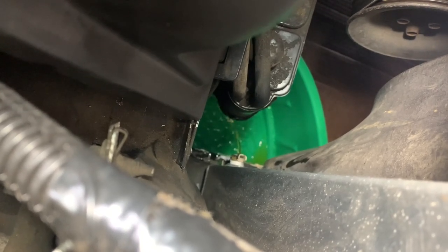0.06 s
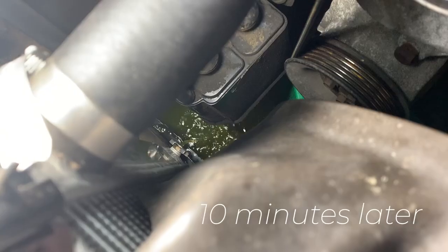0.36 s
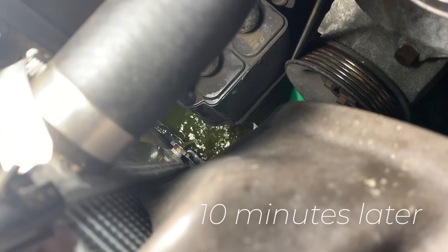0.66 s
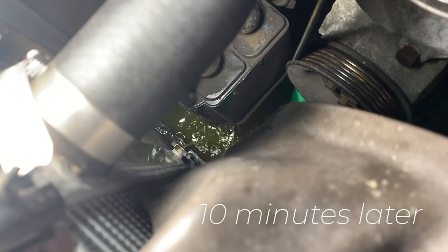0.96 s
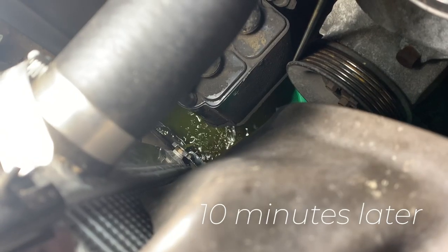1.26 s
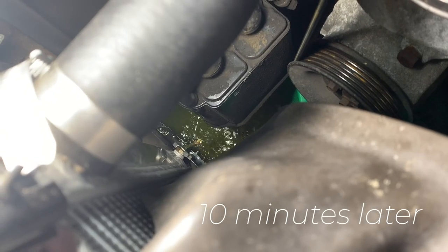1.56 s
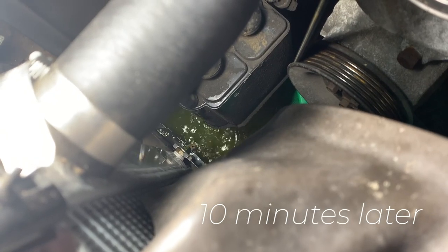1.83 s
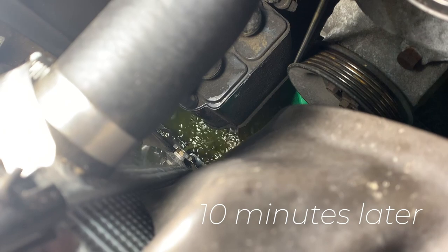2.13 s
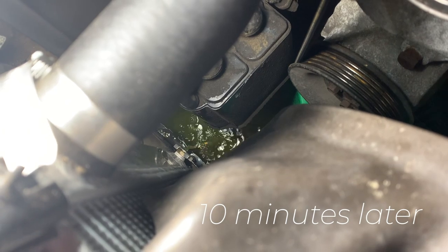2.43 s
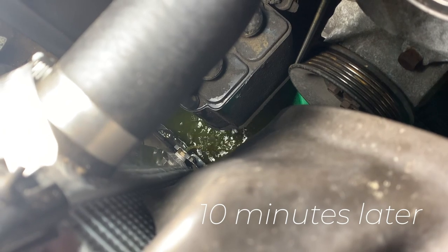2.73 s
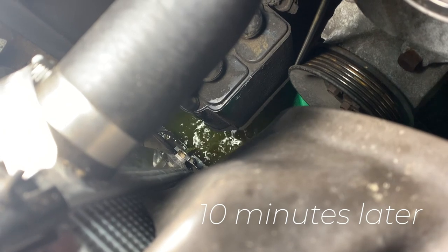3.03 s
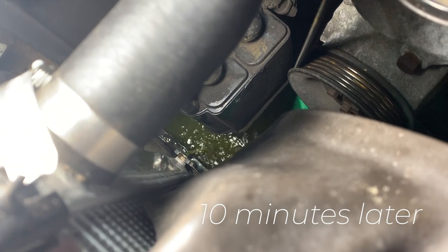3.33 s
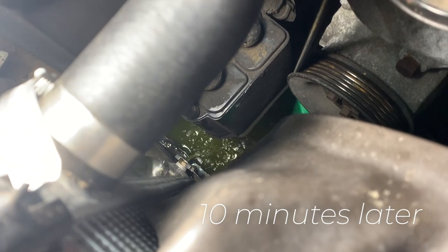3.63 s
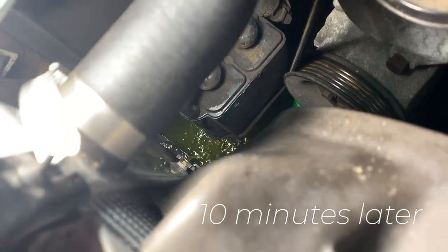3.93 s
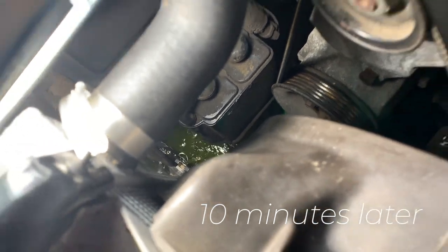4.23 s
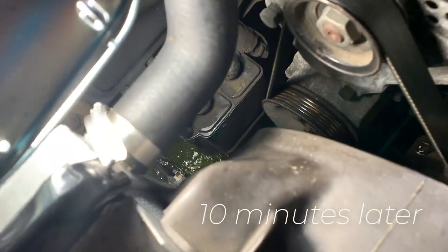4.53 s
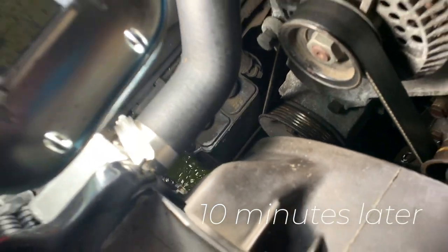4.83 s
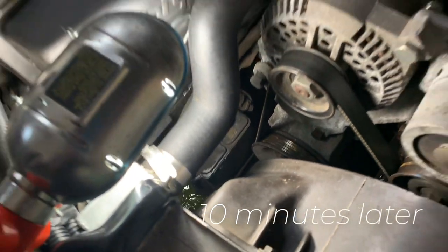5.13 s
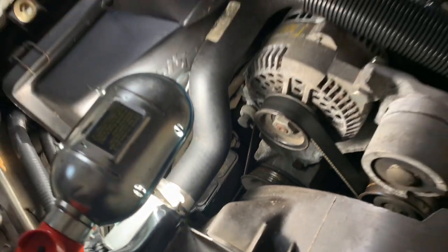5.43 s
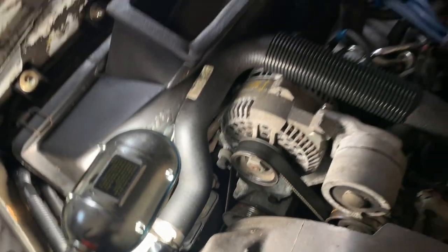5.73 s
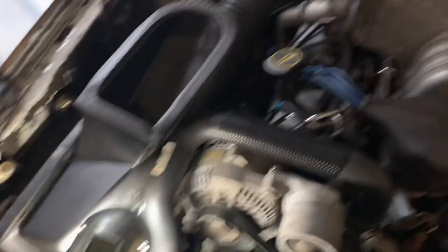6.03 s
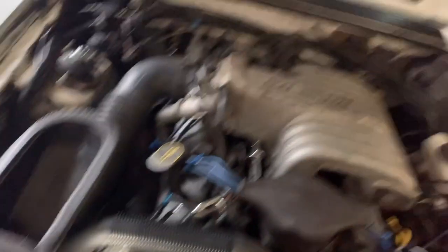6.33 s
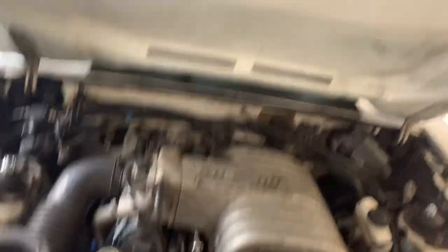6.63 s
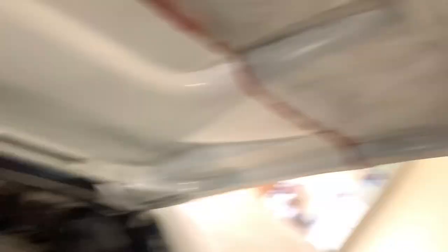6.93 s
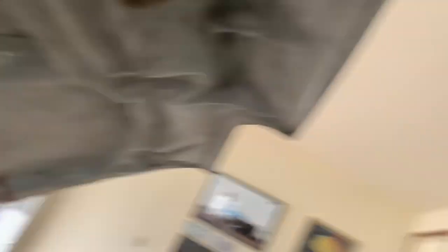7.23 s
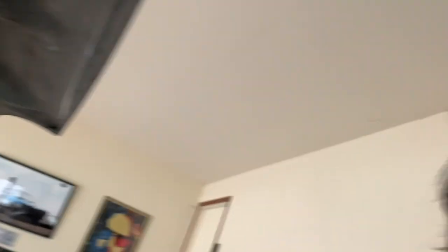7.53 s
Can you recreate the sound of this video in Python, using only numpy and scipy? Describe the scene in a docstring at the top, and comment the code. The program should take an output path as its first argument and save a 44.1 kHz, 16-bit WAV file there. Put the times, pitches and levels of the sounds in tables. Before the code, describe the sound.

A short low rumble with faint drips and one soft bump opens the sound, cutting to an instant of silence just before 0.3 seconds. Then coolant trickles steadily from a car engine into a plastic pan below, heard from above the engine in a garage. Crisp, high drops slap the pool quickly and unevenly, with fine spray pattering between them. Small bubbles plop and gurgle, some sliding upward in pitch, and the pan gives faint hollow knocks. A very faint low hum lies underneath. From about 4.2 seconds the microphone lifts away, and the trickle gradually turns fainter, duller and slightly more echoing. Light handling bumps come around 5.5 seconds, a few dry finger clicks at about 6.6, and a cluster of louder, dull thuds from 7 to 7.2. Sparse drips and small glugs continue until the end, near 7.8 seconds.

```python
"""Coolant trickling into a pan

Coolant runs from an engine into a plastic pan under the car, heard from above the engine in a garage.
Drops slap the pool and knock the pan; trapped air plops, glugs upward or breaks into smaller bubbles;
spray patters between. A short rumble with faint drips and a bump comes first, then a moment of silence.
Near the end the phone that hears it all is lifted away and bumped."""
import sys
import numpy as np
from scipy import signal
from scipy.fft import rfft, irfft, next_fast_len
from scipy.io import wavfile
from scipy.ndimage import uniform_filter1d

SR = 44100
rng = np.random.default_rng(int(sys.argv[2]) if len(sys.argv) > 2 else 0)


def bounce(signal):
    """Save signal as a 16-bit WAV file at the path given by the first command-line argument."""
    frames = np.transpose(np.atleast_2d(signal))
    limited = np.clip(frames, -1, 1)
    pcm = np.round(limited * 32767).astype(np.int16)
    wavfile.write(sys.argv[1], SR, pcm)


N = 342657

# A "fade time" (t60) is how long a sound takes to fall by 60 dB. Table levels are relative.
# large drops hitting the pool; body and top are compared with the crack between them:
# (time [s], level [dB], crater pitch [Hz], body [dB], top [dB], fade time [s])
DROPS = [(0.301, -46.5, 3080.0, 12, 7, 0.023), (0.337, -47, 4410.0, 11, -24, 0.021),
         (0.3765, -39.5, 14300, 9, 16, 0.042), (0.459, -34.5, 6860, -18.0, -8, 0.043),
         (0.565, -39, 4160, 14.5, 4, 0.055), (0.6002, -44.5, 6650, 0, -5.0, 0.082),
         (0.649, -43.5, 7000, 4, -11, 0.036), (0.6735, -36, 4310.0, 9.0, 1, 0.025),
         (0.7119, -47, 9220.0, -1, 3, 0.039), (0.732, -49, 9600, -6.0, 1, 0.045),
         (0.7663, -46.5, 4390.0, 4, -5, 0.024), (0.7938, -46.0, 9250.0, -7.0, 0, 0.037),
         (0.8075, -55, 9200, -16, -5.0, 0.027), (0.8448, -35, 9460, -13, 2, 0.039),
         (0.8834, -43.5, 9900, -26, -10, 0.042), (0.919, -46.5, 6940, -24, -9.0, 0.036),
         (0.9347, -49, 9750, -19, 8, 0.029), (0.9601, -52, 4330, 9, -2.0, 0.04),
         (0.978, -42.5, 9400, -31, -23, 0.027), (0.9977, -42, 5500, 0, -29, 0.079),
         (1.1083, -45, 4460.0, 0, 5.0, 0.038), (1.1294, -48, 14700.0, -15, 9, 0.019),
         (1.1826, -43.5, 3800, 12, -1, 0.052), (1.193, -44, 9200, -18, 4, 0.04),
         (1.2868, -35.5, 6950, -6, -10, 0.028), (1.3148, -34, 14000, -10, 7, 0.032),
         (1.4484, -47, 6660, -27, -25, 0.0093), (1.468, -51.5, 3070, 16.0, -9.0, 0.05),
         (1.5277, -44.5, 14100.0, -5, 7, 0.027), (1.5488, -47, 9660.0, -23, -7, 0.026),
         (1.5606, -48, 9700, -20, 6, 0.038), (1.5903, -49.0, 7700, -29, -27, 0.03),
         (1.637, -46.5, 9680.0, -36, -6, 0.032), (1.6627, -42, 9500, -11.5, -4.0, 0.05),
         (1.6934, -39, 8900, -12, 2, 0.031), (1.7244, -49.5, 9600, -6, -7, 0.033),
         (1.7788, -35, 6900, -6.5, -1, 0.026), (1.8463, -41.5, 6890.0, -2.5, 2.5, 0.05),
         (1.8828, -45, 8710.0, -8, 2, 0.091), (1.9296, -47.5, 4350, 0.0, -6.0, 0.033),
         (1.9566, -42.5, 7300, -26, -3, 0.02), (1.9815, -46.5, 4460.0, 8, -7, 0.08),
         (2.0387, -46.5, 14600, -6, 3, 0.054), (2.0827, -47.5, 9680.0, -6, -2, 0.025),
         (2.1046, -43.5, 8300, -16, -13, 0.035), (2.1247, -44, 14710.0, -14, 11, 0.036),
         (2.1902, -47.5, 6970.0, -1, -16, 0.039), (2.2217, -40.5, 9100, -10, -5.0, 0.05),
         (2.2556, -38.5, 6740, -6.5, -7, 0.036), (2.3166, -38.5, 4450, 2, -3, 0.044),
         (2.3415, -41, 10400, -18.0, 8, 0.024), (2.4146, -42, 7800, -8.0, -10.0, 0.056),
         (2.4384, -47.5, 12190.0, -1, 4.0, 0.034), (2.4649, -48, 6740, -13.0, 2, 0.028),
         (2.4933, -34.0, 7100, -6, -6, 0.035), (2.5112, -37.5, 4400.0, 20, -16, 0.023),
         (2.5284, -42.5, 7100, -20, -10, 0.044), (2.5384, -37.5, 9400, -19, 3, 0.031),
         (2.5797, -42, 9500, -13, -1, 0.026), (2.616, -32, 9500, -10, 0.5, 0.039),
         (2.686, -45.5, 9240.0, -7, -10.0, 0.028), (2.733, -43, 8300, -11, -7, 0.13),
         (2.788, -42.0, 8400, -2, -1, 0.031), (2.8065, -56, 14100.0, -1, 10.0, 0.039),
         (2.8537, -47.5, 9300, -3, -3, 0.051), (2.9097, -32, 4360.0, 5.0, -19.0, 0.016),
         (2.93, -34, 9530, -5, -5, 0.045), (2.9626, -43.0, 4480.0, -3, -3.0, 0.062),
         (2.98, -38.5, 3130, 9, -3, 0.024), (3.0232, -40.5, 4300, 1.5, -3, 0.032),
         (3.0703, -40, 4300, 0.0, -3, 0.05), (3.0906, -44, 14090.0, -1, 5, 0.032),
         (3.1266, -45, 9710.0, -21, -4.0, 0.039), (3.168, -46, 10480.0, -8, 13, 0.026),
         (3.2193, -48, 3120, 7.0, 12, 0.04), (3.2525, -53, 5050.0, 9, 0, 0.041),
         (3.2747, -35, 10100, -5.5, -3, 0.012), (3.3079, -40.5, 9220.0, -9, -19.0, 0.04),
         (3.353, -42.5, 4200, 8.5, -27, 0.085), (3.381, -43, 6710.0, 3, -30, 0.058),
         (3.432, -34.5, 7280, -6.5, -9, 0.038), (3.484, -51, 4390.0, 22, 1, 0.041),
         (3.51, -32.5, 13400, -8, 17, 0.019), (3.55, -45.5, 4430, 7, -12.0, 0.038),
         (3.566, -46, 3450.0, 6, -2.0, 0.082), (3.5991, -44, 3460, 6, 0.0, 0.043),
         (3.6172, -45, 9150.0, -9.0, -5.0, 0.044), (3.6658, -43, 11600, -1, 11, 0.05),
         (3.686, -43, 12100, 8, 13, 0.027), (3.7177, -42, 4000, 7, -9, 0.064),
         (3.7447, -38, 9600, -29, -9, 0.024), (3.765, -46.5, 4400, -3, -12, 0.066),
         (3.7847, -43.5, 9300, -18.0, 0, 0.032), (3.8195, -42, 5850, -4, -9, 0.066),
         (3.84, -41.5, 4100, 13, 0.0, 0.058), (3.86, -33.5, 8250, -6, -19, 0.06),
         (3.8841, -45, 4440.0, -6, -18, 0.041), (3.9123, -42, 14300, -9.0, 2, 0.041),
         (3.9418, -46, 3060, 21, 12, 0.02), (3.9925, -39.0, 12200, -17, -3.5, 0.035),
         (4.0537, -47, 6880.0, -14, -7, 0.029), (4.0805, -41.0, 7100, -12, -4.0, 0.029),
         (4.104, -31.0, 8900, -12, -7, 0.049), (4.1847, -42.5, 7100, -0.5, 2, 0.04),
         (4.205, -41.5, 4020, -4, -2.0, 0.063), (4.2933, -44, 8020.0, 3, 3, 0.04),
         (4.3034, -35.5, 8100, -29, -16, 0.049), (4.3336, -48, 8020.0, -12, -5, 0.062),
         (4.368, -39, 11200, -25, -2, 0.041), (4.394, -55, 14770.0, -19, 14, 0.043),
         (4.4209, -48, 4200, 4, -2, 0.057), (4.441, -51.0, 3600, 7, 0, 0.05),
         (4.4652, -45, 5800, -5, 0, 0.05), (4.5045, -50, 8800, -17, 3, 0.05),
         (4.5466, -38.5, 8200, 0, -2.5, 0.054), (4.6406, -42.5, 5850, -12, -19, 0.014),
         (4.748, -46.5, 12500, 6.5, 9, 0.049), (4.7854, -42.5, 3630, 0, -4, 0.045),
         (4.8142, -49, 8600, -3, -17, 0.033), (4.8386, -46.5, 9100, -26, -13, 0.037),
         (4.8737, -42, 5900, -2, 1, 0.06), (4.9968, -35.5, 4130, 16, -4, 0.08),
         (5.0894, -43, 5860.0, -18, -17, 0.07), (5.1037, -52, 5870.0, -7, -27, 0.043),
         (5.1543, -36, 5700, -16, -22, 0.05), (5.212, -49, 7030.0, -12.0, -5.0, 0.055),
         (5.24, -46, 8600, -26, -3, 0.063), (5.2657, -49, 4980.0, -3, -7, 0.091),
         (5.286, -36.5, 8660, -8.5, -16, 0.072), (5.4608, -45.5, 5470, -16, -20, 0.12),
         (5.5086, -54, 3290.0, 12, -6.0, 0.039), (5.5465, -46, 3370, 1, -30, 0.041),
         (5.574, -48, 10300, -25, -9, 0.057), (5.618, -56, 8660, -19, -18, 0.045),
         (5.6574, -49.5, 4800, 32, -22.0, 0.041), (5.732, -44, 4270, 3, -15.0, 0.049),
         (5.8122, -49.5, 4670, 10, -9, 0.11), (5.8766, -49.5, 13000, -3, 10, 0.096),
         (5.9678, -34.5, 9500, -36, 2, 0.11), (6.0467, -41.5, 9000, 0, -8, 0.068),
         (6.1146, -48.5, 2610.0, 1.5, 3, 0.038), (6.182, -49.5, 4430, -5, -16, 0.025),
         (6.374, -47, 3890, 10, -24, 0.05), (6.4374, -38.5, 5770, -3.5, -25, 0.064),
         (6.6425, -46, 8600, -3, 5, 0.05), (6.701, -47, 8800, -7, -13.0, 0.11),
         (6.772, -50, 2560, 4, -22, 0.036), (6.829, -47, 7000, -2, -29, 0.045),
         (6.867, -54, 3330, -14, -14, 0.05), (6.8788, -50.5, 3370, 8.0, 7, 0.05),
         (6.92, -52, 6900, -7, -11, 0.05), (7.0034, -62, 2666, -6, -4, 0.05),
         (7.0716, -47, 3480, 19, -24, 0.041), (7.626, -56.5, 6640, -10.0, -27, 0.099)]
# the body, crack and top of a drop's sound: (low edge [Hz], high edge [Hz])
DROP_BANDS = [(2500, 5000), (5000, 10500), (10500, 15900)]
# plops of trapped air: (time [s], starting pitch [Hz], level [dB], level of the bubble trail [dB])
PLOPS = [(0.537, 690, -48, -67), (0.647, 1177, -55, -52.5), (0.708, 1340, -47.5, -58.5),
         (0.73, 735, -45, -61.5), (0.85, 1042, -43, -68), (0.978, 1940, -63, -57), (1.075, 1090, -32, -63),
         (1.079, 1900, -48, -63), (1.148, 733, -44, -65), (1.225, 766, -55.5, -74),
         (1.379, 598, -53.5, -76), (1.463, 2910, -48, -90), (1.531, 717, -43.5, -70),
         (1.62, 2370, -50, -90), (1.7, 1145, -44, -61.5), (1.781, 1018, -44.5, -90),
         (1.916, 2190, -49, -67), (2.017, 666, -43.5, -59), (2.086, 1060, -52, -57.5),
         (2.23, 1045, -43, -70), (2.397, 1980, -67, -51), (2.414, 1865, -47.5, -55),
         (2.438, 1090, -50, -63), (2.494, 1120, -38.5, -54.5), (2.546, 858, -44, -69),
         (2.632, 731, -43.5, -58.5), (2.734, 2155, -46.5, -64), (2.791, 1038, -44.5, -55),
         (2.802, 676, -51, -85), (2.908, 2025, -58, -50), (2.981, 1122, -43, -59), (2.983, 3076, -42, -85),
         (3.023, 702, -44, -55), (3.15, 1060, -44.5, -55.5), (3.152, 722, -53.5, -86),
         (3.218, 2970, -45, -73), (3.261, 960, -45, -73), (3.304, 1120, -39.5, -55.5),
         (3.518, 660, -41.5, -67.5), (3.58, 1560, -54.5, -57.5), (3.667, 725, -47.5, -84),
         (3.819, 1106, -44.5, -54), (3.886, 1045, -42.5, -58), (3.942, 646, -50.5, -89),
         (3.996, 1085, -40.5, -102), (4.127, 1086, -40, -81), (4.204, 1425, -43.5, -61),
         (4.42, 1743, -50, -60.5), (4.422, 1126, -49.5, -58), (4.444, 673, -46.5, -67),
         (4.583, 1210, -49, -88), (4.641, 855, -39, -78), (4.649, 1224, -37, -81), (4.693, 1154, -49, -66),
         (5.154, 1176, -46, -97), (5.28, 727, -55.5, -75), (5.327, 1640, -55, -85),
         (5.41, 710, -46.5, -60.5), (5.505, 710, -49.5, -69), (5.577, 1400, -41, -92),
         (5.625, 1110, -45.5, -86), (5.813, 1113, -48.5, -66.5), (5.936, 1120, -52.5, -88),
         (6.045, 1145, -46, -58), (6.095, 2300, -49, -68), (6.117, 1210, -44.5, -62),
         (6.209, 1104, -46.5, -82), (6.299, 567, -58.5, -84), (6.354, 1097, -56, -72),
         (6.397, 2590, -50, -89), (6.642, 635, -52.5, -64.5), (6.773, 2800, -49.5, -81),
         (6.85, 1095, -53.5, -91), (6.922, 1080, -63, -93), (7.275, 568, -61, -90),
         (7.287, 2490, -52.5, -96), (7.34, 616, -57.5, -68), (7.549, 1100, -60, -75),
         (7.698, 1126, -47.5, -75)]
# air tearing loose: (time [s], length [s], starting pitch [Hz], pitch after that length [Hz], level [dB])
GLUGS = [(0.368, 0.022, 1500, 2190, -62), (0.52, 0.012, 1880, 2780, -48.5), (1.147, 0.024, 775, 1610, -44),
         (1.417, 0.0204, 585, 850, -48), (1.697, 0.04, 1045, 2070, -57), (3.163, 0.028, 991, 1940, -61),
         (3.676, 0.035, 893, 2180, -49), (4.131, 0.014, 1060, 1540, -65), (5.421, 0.019, 1070, 1870, -39.5),
         (6.205, 0.017, 1120, 1915, -45.5), (6.985, 0.027, 953, 2010, -47),
         (7.047, 0.034, 2300, 3500, -49.5), (7.22, 0.021, 970, 1600, -51.5), (7.36, 0.046, 755, 2206, -61),
         (7.496, 0.029, 886, 1770, -61), (7.688, 0.027, 885, 1670, -47), (7.718, 0.026, 2390, 3600, -64)]
# the trickle between the large drops: (time [s], gurgle level [dB], spray level [dB])
TRICKLE = [(0.3, -54, -48.5), (0.69, -79.5, -42), (1.13, -51, -44.5), (1.35, -61.5, -50),
           (1.63, -59.5, -52.5), (3.09, -61, -47), (3.63, -57.5, -50), (5.29, -56.5, -48),
           (6.14, -66.5, -56), (6.83, -60, -52.5), (7.77, -66.5, -58)]
# ringing of the pan and the air in it: (pitch [Hz], fade time [s], level [dB])
PAN_RINGS = [(116, 0.18, -8.5), (198, 0.35, -1), (373.8, 0.17, 9), (660, 0.1, 5), (782, 0.3, 9),
             (888, 0.11, -3), (1057, 0.22, 5), (1140, 0.09, 13), (1480, 0.12, 4), (2016, 0.07, 10.5)]
# ringing of the gaps between engine parts: (pitch [Hz], fade time [s], level [dB])
ENGINE_RINGS = [(1830, 0.18, -7.5), (1976, 0.15, -5.5), (2300, 0.055, -6), (2985, 0.017, -6.5),
                (3370, 0.088, 4), (3720, 0.057, -2), (4010, 0.024, -7.5), (4184, 0.12, -14),
                (4280, 0.052, 7), (5358, 0.12, 8), (6640, 0.17, 12), (6730, 0.023, 4), (6980, 0.068, 12),
                (7150, 0.16, -6), (7980, 0.025, -1), (8500, 0.028, 0), (8520, 0.045, -10),
                (9660, 0.049, -11.5), (10570, 0.01, 0), (12200, 0.0088, 7), (14400, 0.012, -5)]
# the hand bumping the phone: (time [s], level [dB], pitch [Hz])
BUMPS = [(0.125, -33, 191), (5.321, -53.5, 74), (5.584, -45.5, 127), (5.61, -50, 65.6), (6.608, -50.5, 415),
         (6.662, -42, 92), (7.01, -40.5, 98), (7.04, -31.5, 119), (7.072, -32, 94), (7.134, -34, 90),
         (7.194, -35, 71)]
# a finger tapping the case: (time [s], level [dB])
CLICKS = [(6.61, -45.5), (6.655, -50), (6.664, -43.5)]
# the garage's low drone: (time [s], level [dB])
DRONE = [(0.3, -68.5), (0.67, -69), (1.6, -60), (2.2, -66.5), (5.8, -72.5), (7.77, -69)]
# how far the phone is from the pan: (time [s], distance [m])
DISTANCE = [(0.3, 0.44), (4.2, 0.43), (5.3, 0.65), (6.4, 0.72), (7.77, 1)]
# how far the left microphone's wave leads the right one's: (frequency [Hz], phase [rad])
LEFT_LEAD = [(0, 0), (150, -0.4), (370, -1.3), (1460, -3.3), (2410, -10.3), (2760, -8.8), (3100, -10.7),
             (3790, -10.8), (6290, -6.9), (7410, -5.6), (8440, -3.7), (11600, 0.7), (12700, 2.7),
             (13700, 3.7), (15000, 6.2), (16400, 6.4)]
# tone of a drop's slap: (frequency [Hz], level [dB])
SLAP_TONE = [(500, -39), (1500, 5), (2100, 6), (2800, -4.5), (3100, 1), (4400, 4.5), (5000, 0.5), (6100, 2),
             (6900, 2), (8000, 5), (9400, 5), (11000, -3.5), (12500, -0.5), (14500, 3), (15600, 0),
             (16000, -11), (16700, -40)]
# tone of a wet splat: (frequency [Hz], level [dB])
SPLAT_TONE = [(150, -43), (350, -4), (480, -26), (600, -14), (750, -5.5), (1100, 5), (2000, -13.5),
              (2800, -6), (3300, -11), (4500, -25), (7000, -10), (16000, -39)]
# tone of the gurgle: (frequency [Hz], level [dB])
GURGLE_TONE = [(300, 1), (520, -11), (680, -13), (920, -10.5), (1100, -10), (1350, -3), (2000, -24),
               (2600, -7.5), (3200, -9), (4300, -16), (6000, -28)]
# how the hollow of the pan favours some small bubbles: (frequency [Hz], level [dB])
HOLLOW_TONE = [(700, 9.5), (900, -11), (1080, 12.5), (1280, 1.5), (1480, 8.5), (1720, -5.5), (2050, 8.5),
               (2400, 1.5), (2850, 2), (3150, 1), (4500, -13), (7000, 5)]
# tone of skin rubbing the case: (frequency [Hz], level [dB])
RUB_TONE = [(25, -31), (60, 13), (170, 3), (280, -3), (500, -31), (2000, -19), (12000, -32)]
# what the garage walls return of the splashing: (frequency [Hz], level [dB])
WALL_TONE = [(1500, -41), (3000, -7), (4200, -2), (6000, 6), (7500, -14), (10000, -7.5), (16000, -15)]
# tone of the garage's drone: (frequency [Hz], level [dB])
DRONE_TONE = [(20, -46), (45, 4), (75, 9.5), (115, 9.5), (160, -3), (195, 0), (270, -11.5), (500, -39),
              (1100, -10), (3000, -56), (8000, -22.5), (16000, -33.5)]
# tone of the opening rumble: (frequency [Hz], level [dB])
RUMBLE_TONE = [(15, -57), (25, -56), (64, -0.5), (161, -13), (200, 0.5), (309, -19), (354, -11.5),
               (775, -17.5), (1480, -29), (1700, -45), (1840, -33), (3520, -55), (4490, -57), (8360, -64),
               (16000, -58)]

RING_CYCLES, RING_EXTRA_S = 18, 0.019  # a plop's fade time: this many cycles, plus a little
RISE_PER_S = 6.8  # typical climb of a plop, as a multiple of its starting pitch
ECHO_DB, SHADE_DB, PAN_DB = 8, -9.5, -12  # change each time the distance doubles


def slaps(gain_db=-3, rise_s=0.0012, lead_s=0.006, splash_db=-16, splash_t60=0.13):
    """Each drop cracks on the pool; its crater and a few air pockets ring, and the splash scatters."""
    out, t, far = np.zeros(N), seconds(5120), doublings()
    from_peak = t - lead_s - 0.00046
    after = np.maximum(from_peak, 0)
    swell = np.exp(np.minimum(from_peak, 0) / rise_s)
    snap = undb(-9) * fade(after, t60=0.005)  # the first instant of the hit
    bands = [signal.butter(4, edges, "band", fs=SR, output="sos") for edges in DROP_BANDS]
    for s, db, crater_hz, body_db, top_db, t60 in list(DROPS) + small_drops():
        splash = undb(splash_db + ECHO_DB * far[int(s * SR)]) * fade(after, splash_t60)
        shape = swell * np.hypot(snap + fade(after, t60), splash)
        uneven_noise = rng.standard_normal(len(t)) * undb(3.5 * wander(len(t), count=40))
        crack = colour(uneven_noise * shape, SLAP_TONE)
        crater = resonate(crack, crater_hz, width=0.045)
        pockets = sum(resonate(crack, hz, width=0.01) for hz in 3000 * 5 ** rng.random(5))
        burst = crack + undb(7) * crater + undb(6) * pockets
        body, middle, top = (unit(signal.sosfilt(band, burst)) for band in bands)
        slap = undb(body_db) * body + middle + undb(top_db) * top
        add(out, s - lead_s, with_energy(slap, db + gain_db, span_s=0.013))
    return out


def small_drops(count=36, spread_db=6, lowest_hz=3800, octaves=1.53):
    """Smaller drops fall at random and follow the spray's level; returns rows like those of DROPS."""
    rows = []
    for when, softness, pitch in rng.random((count, 3)):
        s = when * N / SR
        db = curve(TRICKLE, s, column=2) - 7 - spread_db * softness
        rows.append((s, db, lowest_hz * 2 ** (octaves * pitch), -7, -5, 0.01))
    return rows


def bubble(t, hz, t60, rise, birth_s, rough=0):
    """A pocket of trapped air rings; its pitch climbs as it nears the surface."""
    glide = t + rise * t ** 2 / 2
    tone = np.imag(churn(len(t), rough) * np.exp(2j * np.pi * hz * glide))
    return tone * fade_in(t, birth_s) * fade(t, t60)


def churn(size, rough):
    """The churning pool shakes the strength and timing of a bubble's ring."""
    return 1 + rough * (wander(size, count=70) + 1j * wander(size, count=70))


def plops(gain_db=-3, rise_spread=1.55):
    """Large bubbles: the bigger and lower, the longer they ring. Most climb in pitch; a few sink."""
    out, t = np.zeros(N), seconds(4096)
    for s, hz, db, _ in PLOPS:
        rise = RISE_PER_S * (1 + rise_spread * rng.uniform(-1.07, 1))
        tone = bubble(t, hz, RING_CYCLES / hz + RING_EXTRA_S, rise, birth_s=0.003, rough=0.15)
        add(out, s, with_energy(tone, db + gain_db, span_s=0.019))
    return out


def glugs(gain_db=-3.5, birth_s=0.0013, t60=0.0089):
    """A torn air pocket shrinks quickly, so its ring sweeps upward without a break."""
    out, t = np.zeros(N), seconds(6000)
    for s, length, from_hz, to_hz, db in GLUGS:
        hz = from_hz * (to_hz / from_hz) ** np.minimum(t / length, 1.15)
        tone = np.imag(churn(len(t), rough=0.31) * np.exp(2j * np.pi * np.cumsum(hz) / SR))
        shape = fade_in(t, birth_s) * fade(np.maximum(t - length, 0), t60)
        add(out, s, unit(tone) * shape * undb(db + gain_db))
    return out


def bubble_trails(gain_db=-7, step_s=0.008, step_ratio=1.15, step_db=-0.9, scatter=1.1, count=6):
    """A big bubble pinches off smaller, fainter ones in turn, making a quick upward bloop."""
    out, t = np.zeros(N), seconds(2048)
    for s, plop_hz, _, db in PLOPS:
        for k, (late, sharp) in enumerate(scatter * rng.uniform(-1, 1, (count, 2)), 1):
            hz = plop_hz * step_ratio ** (k + sharp)
            tone = bubble(t, hz, t60=0.02, rise=7, birth_s=0.002, rough=0.5)
            level = db + gain_db + step_db * (k - 5.5)
            add(out, s + (k + late) * step_s, with_energy(tone, level, span_s=0.027))
    return colour(out, HOLLOW_TONE)


def blips(count=60, spread_db=3, far_db=-6, lowest_hz=1000, octaves=1.9):
    """Medium bubbles ring at random between the plops; they grow fainter with distance."""
    out, t = np.zeros(N), seconds(4096)
    for when, pitch, loud, climb in rng.random((count, 4)):
        s, hz = when * N / SR, lowest_hz * 2 ** (octaves * pitch)
        t60 = RING_CYCLES / hz + RING_EXTRA_S
        tone = bubble(t, hz, t60, RISE_PER_S * climb, birth_s=0.002, rough=0.9)
        db = curve(TRICKLE, s, column=1) + spread_db * (2 * loud - 1)
        add(out, s, with_energy(tone, db, span_s=0.021))
    return colour(out, HOLLOW_TONE) * undb(far_db * doublings())


def splats(plop_db=-9, drop_db=-12):
    """Liquid thrown up by each plop and each drop lands as a broad, wet splat."""
    power, t = np.zeros(N), seconds(4096)
    shape = fade_in(t, 0.0063) * fade(t, t60=0.028)
    for s, db in impacts(plop_db, drop_db):
        add(power, s, (shape * undb(db)) ** 2)
    return np.sqrt(power) * unit(colour(rng.standard_normal(N), SPLAT_TONE))


def cavities(gain_db=-15.5, typical_hz=357.4):
    """The hollow under each plop collapses with a short thump, lower or higher with its size."""
    out, t = np.zeros(N), seconds(4096)
    for s, _, db, _ in PLOPS:
        hz = typical_hz * 2 ** rng.uniform(-0.19, 0.17)
        add(out, s, undb(db + gain_db) * bubble(t, hz, t60=0.073, rise=0, birth_s=0.003))
    return out


def pan(gain_db=-66):
    """Collapsing hollows and drops knock the pan, which rings at its own pitches."""
    knocks, t = np.zeros(N), seconds(12000)
    for s, db in impacts(plop_db=0, drop_db=-11):
        add(knocks, s, undb([db]))
    ring = sum(undb(db) * np.sin(2 * np.pi * hz * t) * fade(t, t60) for hz, t60, db in PAN_RINGS)
    return undb(gain_db) * unit(signal.fftconvolve(knocks, ring)[:N])


def gurgle(gain_db=-5, cycles=28, count=1100):
    """Many small bubbles of mixed sizes ring under the stream."""
    out, t = np.zeros(N), seconds(2048)
    for when, pitch, softness, climb in rng.random((count, 4)):
        hz = 550 * 8 ** pitch
        tone = bubble(t, hz, t60=cycles / hz + 0.01, rise=10 * climb, birth_s=0.0015, rough=0.5)
        db = -4.5 * np.log(max(softness, 0.03))  # most are faint, a few stand out
        add(out, when * N / SR, unit(tone) * undb(db))
    return unit(colour(out, GURGLE_TONE)) * undb(gain_db + curve(TRICKLE, seconds(N), column=1))


def spray(gain_db=-12, crack_t60=0.0033, splash_t60=0.045, splash_db=-11, count=380):
    """Tiny droplets patter back onto the pool."""
    hits, t = np.zeros(N), seconds(3000)
    for when, softness in rng.random((count, 2)):
        db = -5 * np.log(max(softness, 0.02))
        add(hits, when * N / SR, undb([db]) ** 2)
    shape = fade_in(t, 0.0038) * np.hypot(fade(t, crack_t60), undb(splash_db) * fade(t, splash_t60))
    power = signal.fftconvolve(hits, shape ** 2)[:N]
    patter = colour(np.sqrt(np.abs(power)) * rng.standard_normal(N), SLAP_TONE, tilt_db=-1)
    return unit(patter) * undb(gain_db + curve(TRICKLE, seconds(N), column=2))


def bumps(gain_db=-1, rub_db=-9):
    """The hand thuds softly on the phone, each time with a low rub."""
    out, t = np.zeros(N), seconds(8192)
    for s, db, hz in BUMPS:
        thud = np.sin(2 * np.pi * hz * t) * fade(t, t60=0.084)
        rub = unit(colour(rng.standard_normal(len(t)), RUB_TONE, tilt_db=-2)) * fade(t, t60=0.16)
        add(out, s, undb(db + gain_db) * fade_in(t, 0.012) * (thud + undb(rub_db) * rub))
    return out


def clicks(t60=0.016):
    """A finger taps the case with short, dry clicks."""
    out, t = np.zeros(N), seconds(2048)
    for s, db in CLICKS:
        noise = unit(colour(rng.standard_normal(len(t)), SPLAT_TONE))
        add(out, s, undb(db) * fade(t, t60) * noise)
    return out


def engine_gaps(x, gain_db=-3):
    """The sound passes up through gaps between engine parts, which ring briefly at their own pitches."""
    t = seconds(4096)
    rings = sum(undb(db) * np.cos(2 * np.pi * hz * t) * fade(t, t60) * 2 / np.sum(fade(t, t60))
                for hz, t60, db in ENGINE_RINGS)
    return x + undb(gain_db) * signal.fftconvolve(x, rings)[:N]


def engine_shade(x, edge_hz=10500, near_db=2):
    """The engine hides more of the highest treble as the phone moves off."""
    dull = signal.sosfiltfilt(signal.butter(2, edge_hz, fs=SR, output="sos"), x)
    return dull + (x - dull) * undb(near_db + SHADE_DB * doublings())


def echoes(x, high_db, low_t60=0.15, high_t60=0.0069):
    """Sound bounces around the engine bay and the garage; the treble dies first."""
    t, noise = seconds(20000), rng.standard_normal(20000)
    low = signal.sosfilt(signal.butter(4, 3300, fs=SR, output="sos"), noise)
    high = signal.sosfilt(signal.butter(2, 3500, "high", fs=SR, output="sos"), noise)
    onset = fade_in(t, 0.0001)
    tail = onset * (low * fade(t, low_t60) - undb(high_db) * high * fade(t, high_t60))
    return signal.fftconvolve(x, tail / np.linalg.norm(onset * fade(t, low_t60)))[:N]


def wall_hiss(x, near_db=-24, far_db=13, t60=0.7):
    """Splashes linger in the garage as a soft hiss that stands out more as the phone moves off."""
    t = seconds(22000)
    tail = colour(rng.standard_normal(len(t)), WALL_TONE) * fade_in(t, 0.02) * fade(t, t60)
    return signal.fftconvolve(x * undb(near_db + far_db * doublings()), tail / np.linalg.norm(tail))[:N]


def microphones(x):
    """Two microphones hear the same wave a little out of step, by an amount that varies with pitch."""
    size = next_fast_len(N)
    lead = curve(LEFT_LEAD, np.fft.rfftfreq(size, 1 / SR), column=1)
    shift = np.exp(1j * np.array([lead, -lead]) / 2)
    return irfft(rfft(x, size) * shift, size)[:, :N]


def background(tone, level_db):
    """Low, slightly wavering noise, mostly alike on the left and right."""
    shared, side = (unit(colour(rng.standard_normal(N), tone)) for _ in range(2))
    return undb(level_db + wander(N, count=2500)) * (shared + undb(-9) * np.array([side, -side]))


def impacts(plop_db, drop_db):
    """The time and level of every plop and large drop, with a gain for each kind."""
    return [(s, db + plop_db) for s, _, db, _ in PLOPS] + [(s, db + drop_db) for s, db, *_ in DROPS]


def doublings():
    """How many times the distance from the pan has doubled, at each moment."""
    return np.log2(curve(DISTANCE, seconds(N), column=1) / DISTANCE[0][1])


def colour(x, tone, tilt_db=0):
    """Shape a sound with a tone table; the tilt, in dB per octave, tips the treble around 7.8 kHz."""
    size = next_fast_len(len(x))
    hz = np.maximum(np.fft.rfftfreq(size, 1 / SR), 1)
    tone_hz, tone_db = np.transpose(tone)
    octaves = np.clip(np.log2(hz / 7800), -1, 0.5)
    db = np.interp(np.log(hz), np.log(tone_hz), tone_db) + tilt_db * octaves
    return irfft(rfft(x, size) * undb(db), size)[:len(x)]


def resonate(x, hz, width):
    """Keep a narrow ringing band; its width is a fraction of its pitch."""
    return signal.lfilter(*signal.iirpeak(hz, 1 / width, fs=SR), x)


def wander(size, count):
    """Smooth random values, about 1 in size, that change over about `count` samples."""
    return unit(uniform_filter1d(uniform_filter1d(rng.standard_normal(size), count), count))


def fade_in(t, rise_s):
    """Rise from 0 toward 1, about two thirds of the way after rise_s."""
    return 1 - np.exp(-t / rise_s)


def fade(t, t60):
    """Die away by 60 dB every t60 seconds."""
    return np.exp(-np.log(1000) * t / t60)


def with_energy(x, db, span_s):
    """Give a sound the energy of a steady level held for span_s."""
    return x * undb(db) / np.sqrt(np.sum(x ** 2) / (span_s * SR))


def unit(x):
    """Scale to an average power of 1."""
    return x / np.sqrt(np.mean(x ** 2) + 1e-24)


def undb(db):
    """Turn decibels into a multiplier."""
    return 10 ** (np.asarray(db) / 20)


def curve(table, at, column):
    """Read a table's column, joining its rows with straight lines."""
    table = np.array(table)
    return np.interp(at, table[:, 0], table[:, column])


def seconds(count):
    """The times of this many samples."""
    return np.arange(count) / SR


def add(track, s, sound):
    """Mix a sound into a track at s seconds."""
    i = int(np.clip(s * SR, 0, N - 1))
    track[i:i + len(sound)] += sound[:N - i]


def scene(rumble_end_s=0.264, trickle_start_s=0.298, switch_s=0.002):
    """A rumble with faint drips, a short silence, then the trickle in its garage."""
    now, far = seconds(N), doublings()
    pan_ring = pan() * undb(PAN_DB * far)
    splashing = slaps() + engine_shade(spray())
    liquid = engine_gaps(splashing + splats() + bubble_trails() + blips())
    liquid += glugs() + plops() + cavities() + pan_ring + gurgle()
    to_walls = liquid * undb(ECHO_DB * far)
    wide_echo = np.array([echoes(to_walls, high_db=-9) for _ in range(2)])
    centre = liquid + wall_hiss(splashing) + undb(-14) * echoes(to_walls, high_db=-5)
    draining = microphones(centre) + undb(-3.5) * wide_echo
    drone = background(DRONE_TONE, level_db=curve(DRONE, now, column=1))
    opening = background(RUMBLE_TONE, level_db=-49) + undb(-10.5) * draining
    handling = bumps() + clicks()
    before_gap = np.clip((rumble_end_s - now) / switch_s, 0, 1)
    after_gap = np.clip((now - trickle_start_s) / switch_s, 0, 1)
    return (opening + handling) * before_gap + (draining + drone + handling) * after_gap


def record(dry, top_hz=16800):
    """The phone cuts off the highest treble."""
    return signal.sosfilt(signal.ellip(10, 0.2, 70, top_hz, fs=SR, output="sos"), dry)


dry = scene()
out = record(dry)
bounce(out)
```